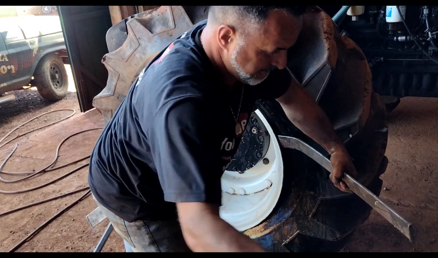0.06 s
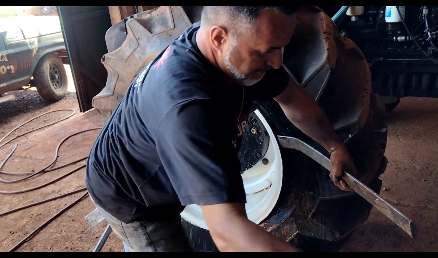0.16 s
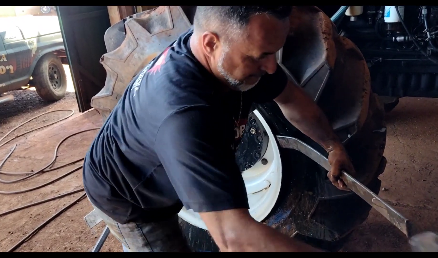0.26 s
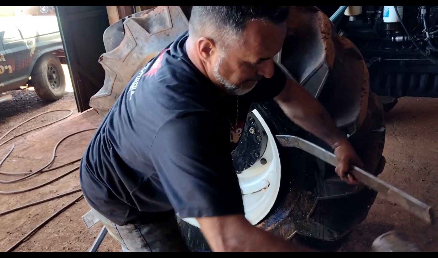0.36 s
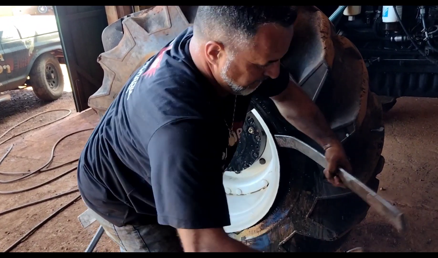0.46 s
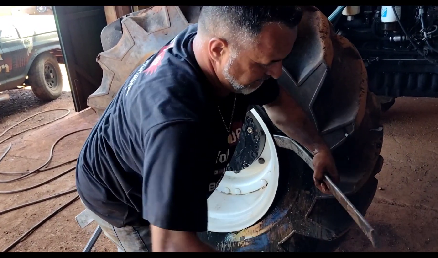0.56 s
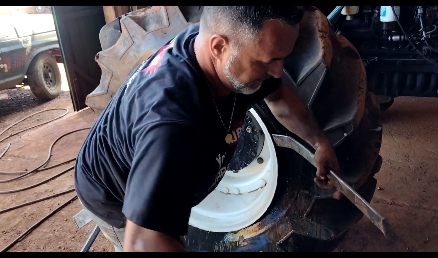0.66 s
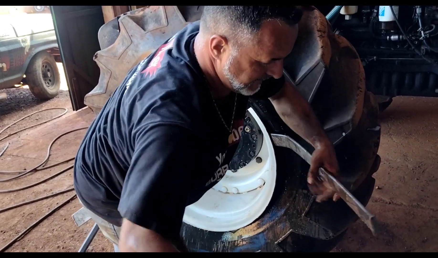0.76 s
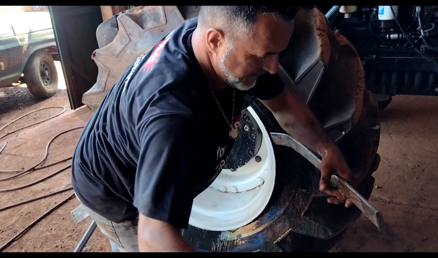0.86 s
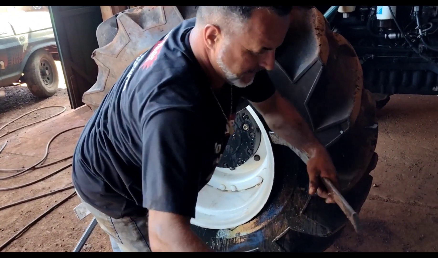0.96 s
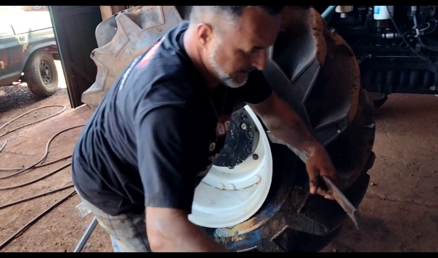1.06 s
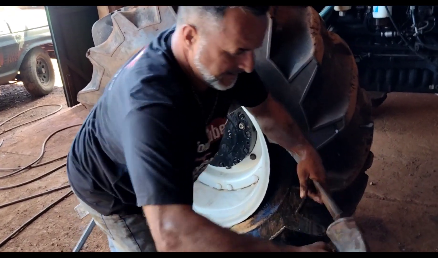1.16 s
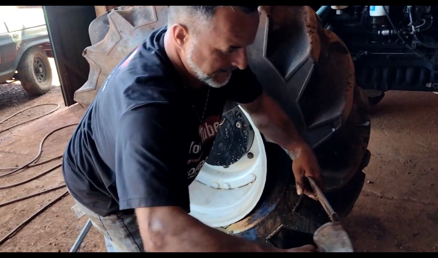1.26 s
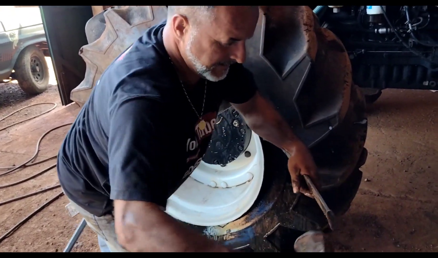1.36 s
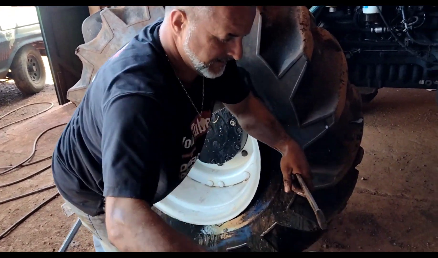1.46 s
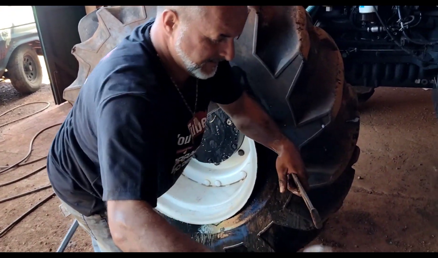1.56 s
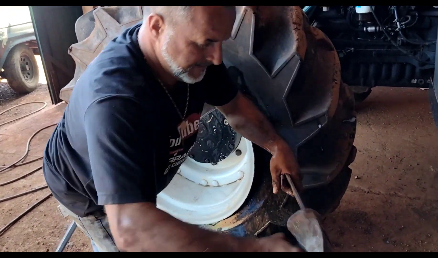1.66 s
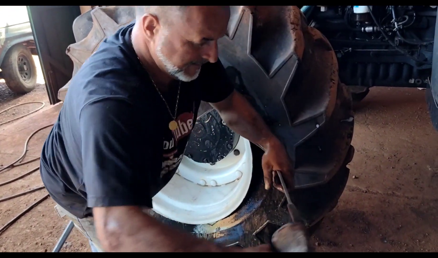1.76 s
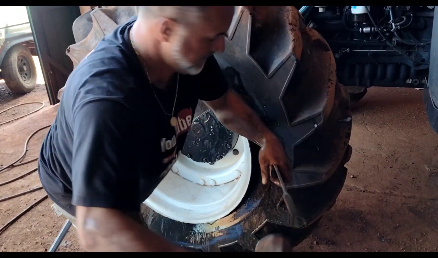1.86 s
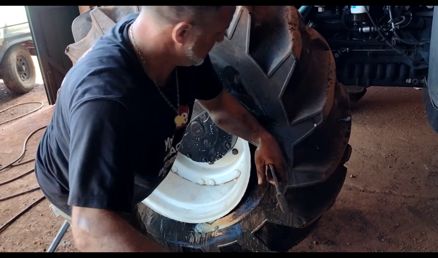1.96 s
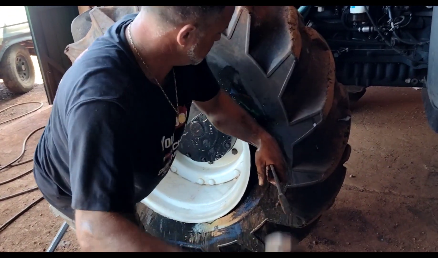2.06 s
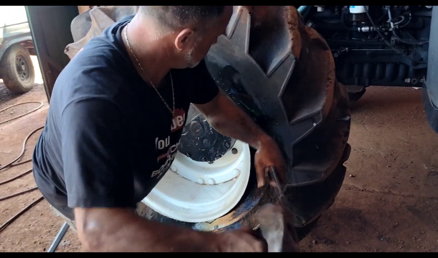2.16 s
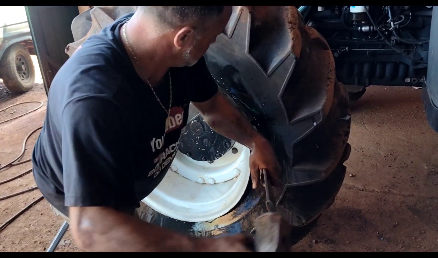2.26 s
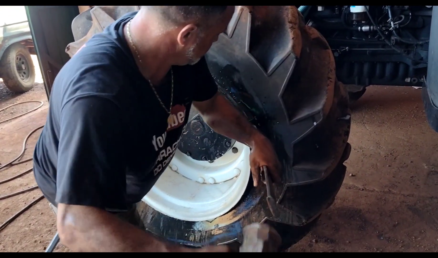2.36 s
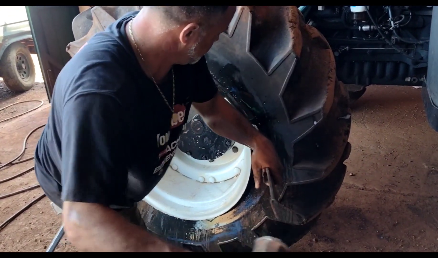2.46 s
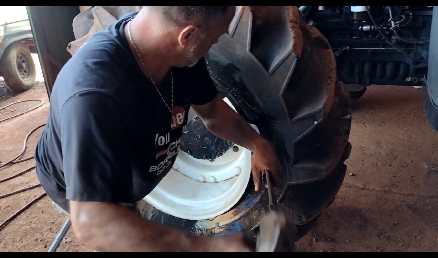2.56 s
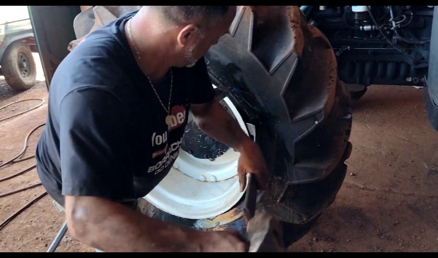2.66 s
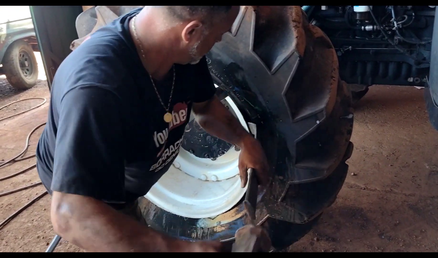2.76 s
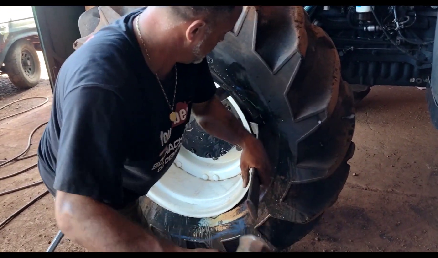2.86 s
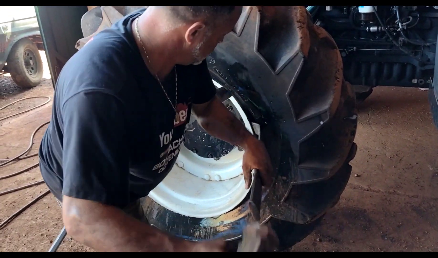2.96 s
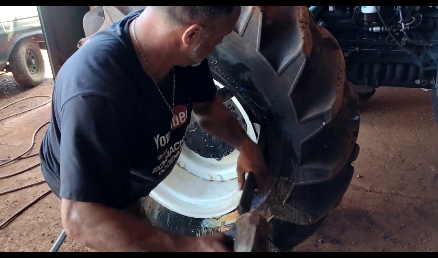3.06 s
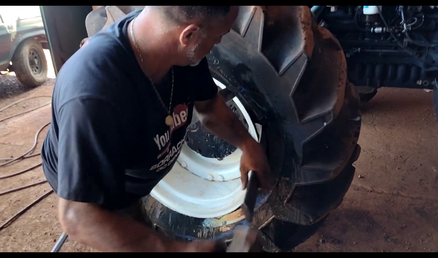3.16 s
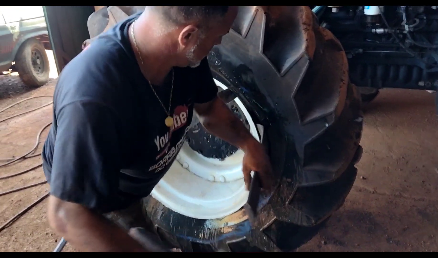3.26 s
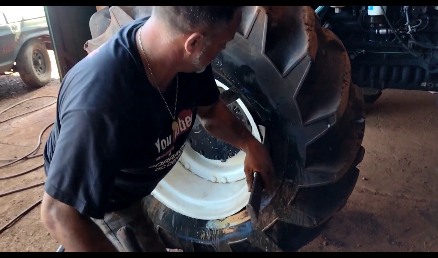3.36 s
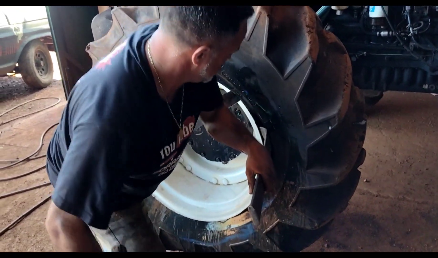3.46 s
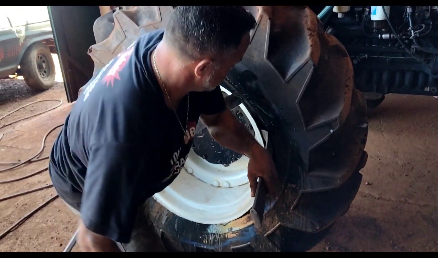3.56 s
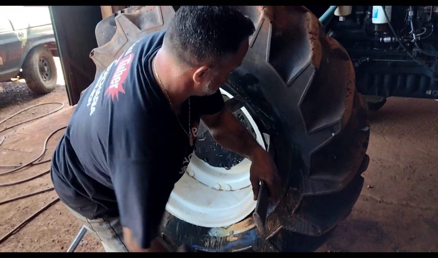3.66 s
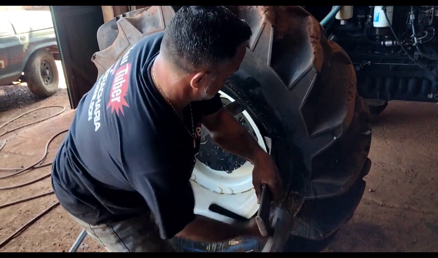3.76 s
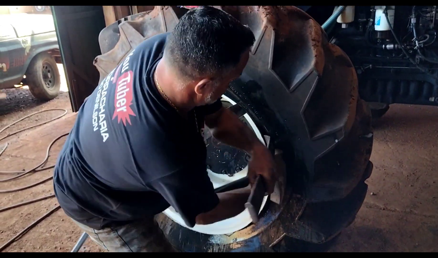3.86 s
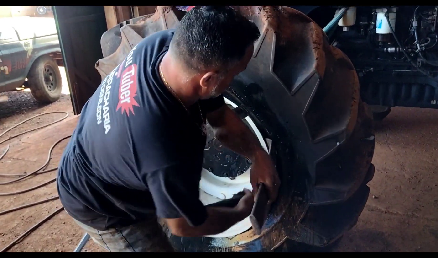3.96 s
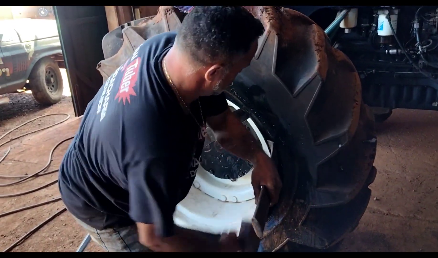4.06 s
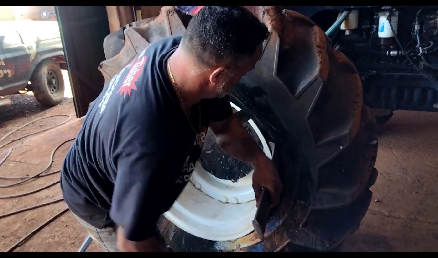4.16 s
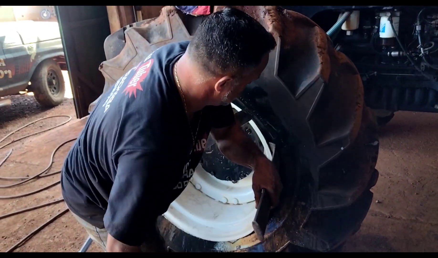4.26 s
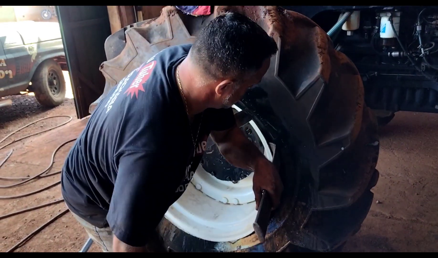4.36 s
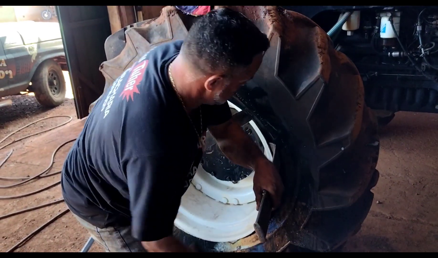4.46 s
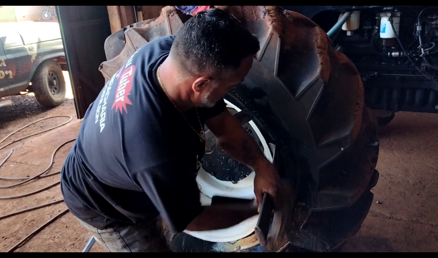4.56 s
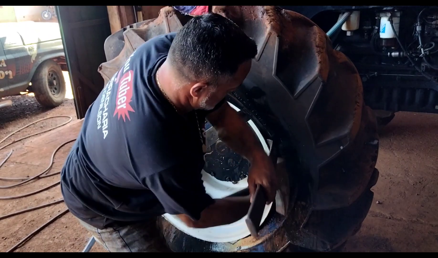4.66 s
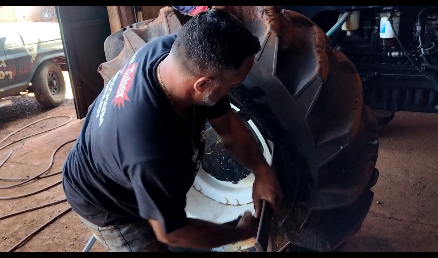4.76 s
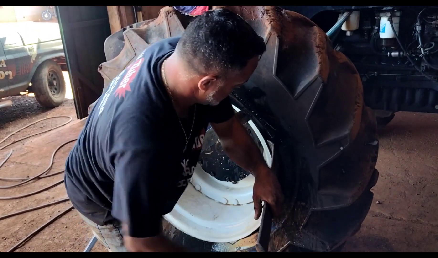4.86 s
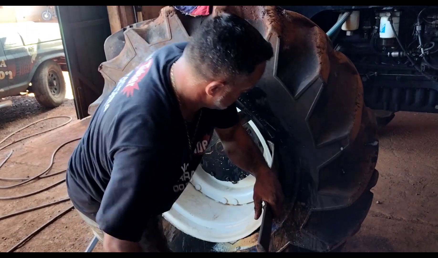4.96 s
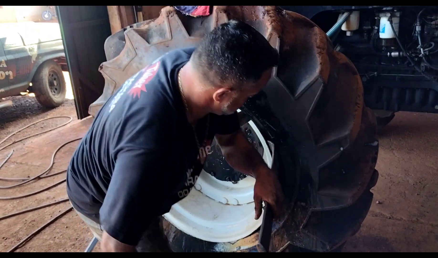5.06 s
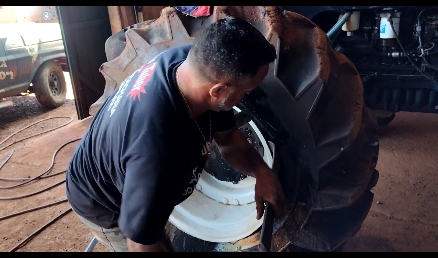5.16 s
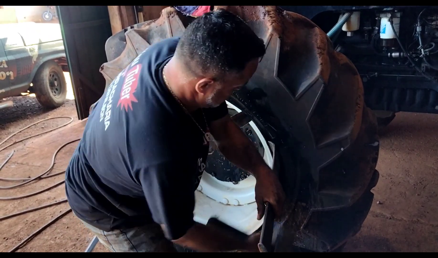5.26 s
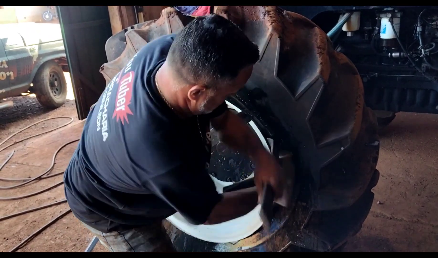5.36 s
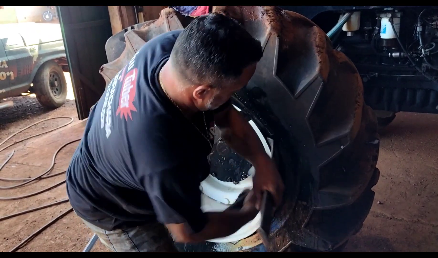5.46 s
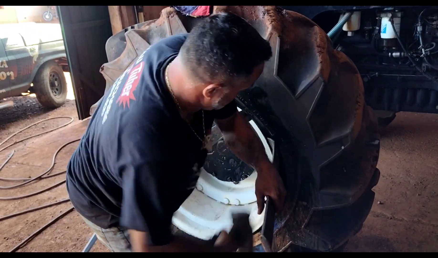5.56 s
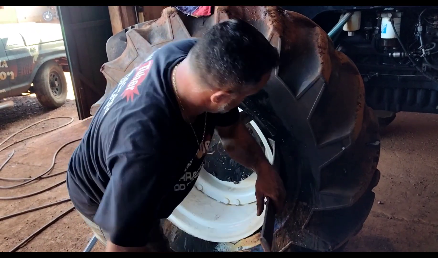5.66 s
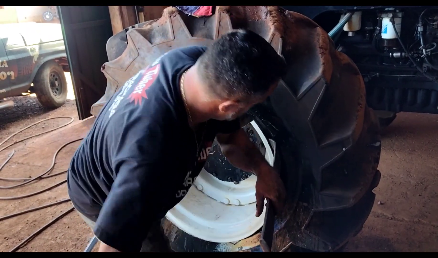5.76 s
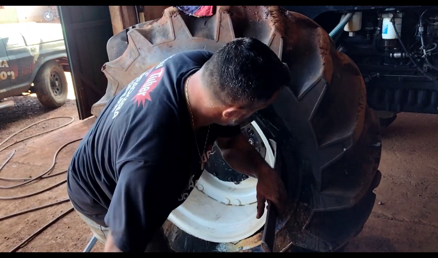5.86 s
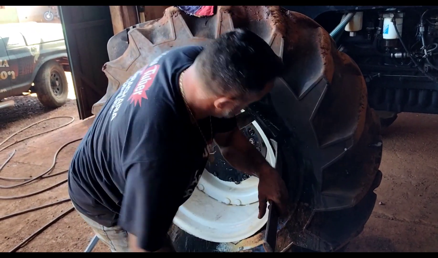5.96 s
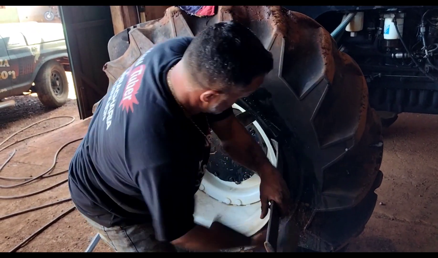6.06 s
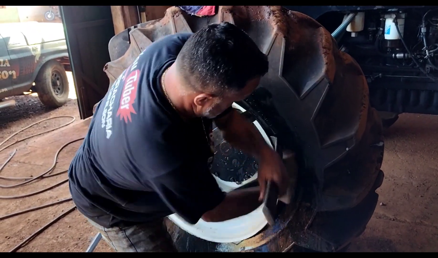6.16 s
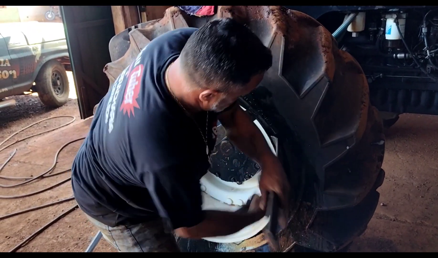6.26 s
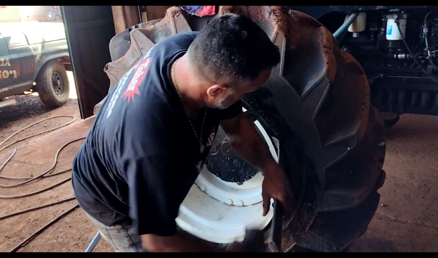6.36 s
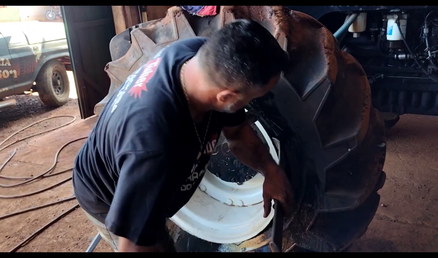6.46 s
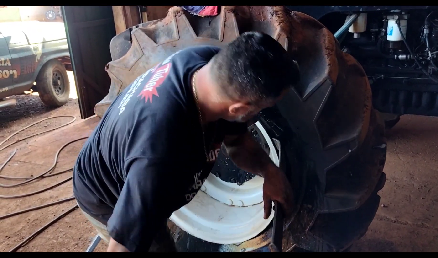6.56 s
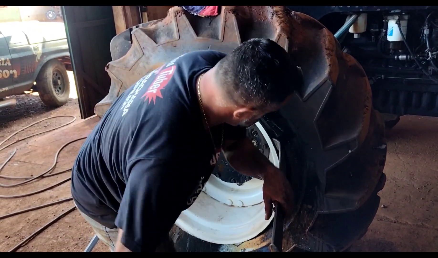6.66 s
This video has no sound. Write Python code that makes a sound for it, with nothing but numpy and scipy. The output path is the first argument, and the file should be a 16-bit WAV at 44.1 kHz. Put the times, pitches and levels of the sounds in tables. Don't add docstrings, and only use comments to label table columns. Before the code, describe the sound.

In a large echoing workshop, a hammer strikes a steel lever wedged at a big tractor wheel ten times. The first six blows are slack and clanky, getting quicker and weaker; after a pause come four slower, stronger, tighter hits. Each cracks sharply and rings for about a second. A close phone microphone overloads and ducks briefly, over faint hiss and low draught.

```python
import sys
import numpy as np
from scipy import signal
from scipy.io import wavfile
from scipy.ndimage import uniform_filter1d

SR = 44100
rng = np.random.default_rng(int(sys.argv[2]) if len(sys.argv) > 2 else 0)


def store_pcm(level_fs):
    pcm = np.round(np.clip(level_fs, -1, 1) * 32767).astype(np.int16)
    wavfile.write(sys.argv[1], SR, np.atleast_2d(pcm).T)


def ratio_of_db(decibels):
    return 10 ** (np.asarray(decibels, float) / 20)


N = 296381

STRIKES_S = [
    .3845,
    1.2351,
    1.7441,
    2.2272,
    2.6785,
    3.0839,
    3.9075,
    4.6691,
    5.4073,
    6.1987,
]
# strength in dB, bite of the lever (0 loose, 1 slack, 2 seated, 3 prying, 4 wedged),
# pitch shift in %, brightness in dB per octave, limiter depth in dB.
BLOWS = [
    (-7.5, 1.47, -0.57, 0.3, 9),
    (-9.5, 1, 0.12, -0.5, 5.5),
    (-8, 1.14, -0.34, 0.3, 5.5),
    (-10, 0.61, -0.00015, 0.2, 5),
    (-9.5, 0.071, 0.74, 0, 7.5),
    (-13.5, 0.089, .2, -0.3, 3),
    (-5.5, 2.35, 0.25, -1.33, 10.5),
    (-3, 3.2, 0.28, -1, 9.5),
    (-1.5, 3.98, -0.49, 0.75, 8),
    (-2, 3.87, .5, -.3, 8),
]
# centre in Hz, width in Hz, level in dB when loose, slack,
# seated, prying, wedged.
LEVER_MODES = [(778, 33, 0.5, 2, -4, -5, -12), (1036, 56, 4.5, 1, -5, -4, 0.5),
               (1235, 41, 0.5, 1.5, -44, -19, -19), (1462, 36, -9, -12, -31, -1.5, 5),
               (1628, 50, 1, 3, 3.5, -4, 2.5), (1846, 45, -3, 1.5, 0.7, -15, -31),
               (2273, 118, -6, 5.5, -4, -17, 10.5), (2518, 71, -2.5, 2.5, 7, -17, 3),
               (2762, 73, -12, 1.5, -13, -23, 4.5), (3416, 124, -1, 8, 5.2, -10, 1.5),
               (3770, 150, -2, -4, 0.7, -37, -30), (4010, 76, -9, -9, -4, -20, -40),
               (4290, 300, -9.5, -3, -0.5, -11, -52), (5010, 240, -4, -3, -8, -2.5, -5)]
# centre in Hz, width in Hz, level in dB when # loose, slack, seated,
# prying, wedged.
HEAD_MODES = [(5070, 65, -13, -13, -22, -17, 7.5), (5500, 86, -6, -2, -16, -9, 9.5),
              (5820, 55, -8, 3.5, -9, -7, -21), (6190, 60, -12, -7, -8, -20, -19),
              (6403, 170, -3, -2, 4.5, -6, -5), (6600, 110, -14, -22, -18, 10, -5),
              (6940, 50, -23, 4, -36, -3, 0), (7300, 104, -41, -21, 11.5, 5, -23),
              (7730, 120, 0, 4.5, -16, -12, -1), (7810, 59, -2, -11, -18, -10, 7),
              (8260, 200, -13, -28, 0, -10, -7), (9020, 45, -2, 4.5, -13, -3, 4),
              (9245, 133, -5, -5, -8, -17, -2), (9740, 64, -21, -56, -8, 0, -2)]
# centre in Hz, width in Hz, level in dB.
RIM_MODES = [(638, 57, -5.5), (774, 30, -8.5), (968, 50, -7.5), (1108, 13, -4.5), (1175, 71, -6.5),
             (1400, 66, -7.5), (1550, 30, -24), (1935, 14, -20), (2223, 164, -4.5), (2584, 44, -0.5)]
# centre in Hz, width in Hz, level in dB.
TYRE_MODES = [(161, 42, 3.5), (201.5, 24, 3), (251, 83, -0.5), (387, 51, 3.5)]
# frequency in Hz, level in dB per Hz.
KNOCK = [(60, -47), (130, -46), (300, -48), (500, -49.5), (700, -10), (1300, -11), (2400, -3.5),
         (4500, -13.5), (7000, -7), (9000, -11.5), (12000, -16), (15000, -77), (16000, -75)]
# frequency in Hz, level in dB per Hz.
CRACK = [(60, -8.5), (300, -20.5), (1000, -18), (2300, -6), (3400, -3), (4500, -9), (6500, -11.5),
         (9500, -14.5), (12000, -15.5), (16000, -21)]
# frequency in Hz, T60 in seconds.
HALL_T60 = [(100, 1.23), (260, 1.2), (700, 1.144), (1840, 1.328), (4850, 1.187), (10000, 0.8)]
# frequency in Hz, left-right likeness from 0 to 1.
HALL_LIKENESS = [(60, .7), (200, .98), (450, .85), (800, .55), (1700, .25), (2600, .05)]
# frequency in Hz, left minus right in dB.
HALL_LEAN = [(100, 3.5), (800, 4), (1650, .5), (2200, -8), (3700, 2), (4800, .5), (7000, -8), (11500, 7)]
# time in seconds, level in dB.
DRAUGHT = [
    (0.0, -51.5),
    (0.58, -52),
    (1.05, -82),
    (2.32, -80),
    (3.74, -51),
    (4.1, -47),
    (5.3, -46),
    (5.62, -42),
    (6.72, -45),
]
# frequency in Hz, level in dB per Hz.
HISS = [(25, 1.5), (170, -15.5), (560, -20), (1020, -15.5), (1400, -25), (2550, -18), (3700, -20.5),
        (4600, -26.5), (5400, -13), (6300, -12), (10400, -4), (11500, -9), (13500, -12.5), (14600, -14),
        (15400, -17.5)]
# frequency in Hz, left-right likeness from 0 to 1.
HISS_LIKENESS = [(60, 0.19), (180, 0.8), (550, 0.75), (1650, 0.15), (4970, 0.06), (15000, 0.03)]
# frequency in Hz, left minus right in dB.
HISS_LEAN = [(300, 0), (1200, -2), (2250, -11), (3000, -9), (3700, -2), (6200, -14), (8700, -4), (14000, 3)]
# frequency in Hz, threshold in dB under the whole sound.
MASKED = [(2800, 50), (3400, 27), (4700, 42), (5200, 48), (8700, 35), (10500, 34.5), (12000, 37.5),
          (15000, 45.5)]

LANDING_DB, LANDING_PERCENT = 1.6, 0.6
REGRIP_S = 3.5
THUMP_BEFORE_DB, THUMP_AFTER_DB, CRACK_THUMP_DB = -10, -19.5, -17
QUICK_S, RESTED_S = 0.49, 1
CRACK_QUICK_DB, CRACK_RESTED_DB = 18.5, -1
CRACK_TILT_DB, CRACK_TILT_DB_PER_S = -2.05, 1.1
PAN_DB, PAN_DB_PER_S = -0.2, 0.15
LEFT_LATE_SAMPLES = 10
OVERLOAD, CEILING_DB = 1.71, -16
SWING_LEFT, SWING_LEFT_PER_DB, SWING_RIGHT = -0.1, 0.067, 0.3
BLOCK_S, FIRST_BLOCK_S = 0.022041, 0.0043
LEAST_HOLD_S, LET_GO_S = 0.0775, 0.002
DRAUGHT_LEAN_DB, HISS_DB, EDGE_HZ = 1.5, -41, 15350


def evened(x):
    return x / np.sqrt(np.mean(x ** 2))


def read(points, hz):
    f, value = np.transpose(points)
    return np.interp(np.log(hz + 1), np.log(f + 1), value)


def noise_pair(length, size, likeness, gain):
    frames = 4 * length // size + 5
    hz = np.fft.rfftfreq(size, 1 / SR)[:, None]
    a, b, c, d = rng.standard_normal((frames, len(hz), 4)).T
    like = np.clip(read(likeness, hz), -1, 1)
    left = a + 1j * b
    right = like * left + np.sqrt(1 - like ** 2) * (c + 1j * d)
    z = np.array([left, right]) * gain(hz, np.arange(frames) * size / 4 / SR)
    return signal.istft(z, nperseg=size, noverlap=3 * size // 4)[1][:, :length]


def ring_modes(bite, shift_percent, landing):
    rows = np.array(LEVER_MODES + HEAD_MODES)
    share = np.maximum(1 - abs(np.clip(bite, 0, 4) - np.arange(5)), 0)
    db = rows[:, 2:] @ share + LANDING_DB * landing
    detune_percent = shift_percent + LANDING_PERCENT * landing[::-1]
    return np.column_stack([rows[:, 0] * (1 + detune_percent / 100), rows[:, 1], db])


def mode_power(rows, hz):
    centre_hz, width_hz, db = np.transpose(rows)[:, :, None]
    return (ratio_of_db(2 * db) / (1 + (2 * (hz - centre_hz) / width_hz) ** 2) ** 1.184).sum(0)


def strike(contact, rings, thump_db, tilt_db, ring_db, size=16384):
    hz = abs(np.fft.fftfreq(size, 1 / SR))
    steel = mode_power(rings, hz) + mode_power(RIM_MODES, hz)
    power = ratio_of_db(2 * read(contact, hz)) + ratio_of_db(2 * ring_db) * steel
    power = power * ratio_of_db(2 * tilt_db * np.log2((hz + 500) / 2500))
    power = power + ratio_of_db(2 * thump_db) * mode_power(TYRE_MODES, hz)
    partials = evened(uniform_filter1d(rng.standard_normal(size // 2 + 1), size=12))
    mirrored = np.minimum(np.arange(size), size - np.arange(size))
    log_gain = np.log(np.sqrt(power) * ratio_of_db(1.69 * partials[mirrored]))
    return np.fft.ifft(np.exp(np.conj(signal.hilbert(log_gain)))).real[:size // 2]


def blow(rings, strength_db, thump_db, tilt_db, direct_db, crack_tilt_db, pan_db):
    knock = strike(KNOCK, rings, thump_db, tilt_db, 0)
    tail = signal.fftconvolve(knock[None], hall(), axes=1)
    tail /= np.sqrt(np.mean(tail[:, SR // 10:SR // 5] ** 2))
    t = np.arange(1500) / SR
    clatter = rng.standard_normal((2, 1500)) * (np.exp(-t / 0.00019) + 0.23 * np.exp(-t / 0.0096))
    clatter[:, :6] += 1.3 * np.hanning(6)
    crack = strike(CRACK, rings, CRACK_THUMP_DB, crack_tilt_db, -4.0)
    direct = signal.fftconvolve(crack[None], clatter, axes=1)
    direct /= np.sqrt(np.mean(direct[:, :900] ** 2, 1, keepdims=True))
    tail[:, :direct.shape[1]] += ratio_of_db(direct_db) * direct
    return ratio_of_db(strength_db + pan_db * np.array([[.5], [-.5]])) * tail


def hall():
    clumps = rng.standard_normal((4 * 2 * SR // 256 + 5, 129)).T
    clumps = uniform_filter1d(clumps, size=24, axis=0)
    clumps = evened(uniform_filter1d(clumps, size=5, axis=1))

    def gain(hz, t):
        lean_db = read(HALL_LEAN, hz) * np.array([.5, -.5])[:, None, None]
        return ratio_of_db(lean_db) * ratio_of_db(0.6 * clumps - 60 * t / read(HALL_T60, hz))

    tail = noise_pair(2 * SR, 256, HALL_LIKENESS, gain)
    tail[0] = np.roll(tail[0], LEFT_LATE_SAMPLES)
    return tail * (1 - np.exp(-np.arange(2 * SR) / SR / 0.00053))


def scene():
    mix, last_s = np.zeros((2, N + 3 * SR)), -1
    landings = rng.standard_normal((len(BLOWS), len(LEVER_MODES + HEAD_MODES)))
    for s, (strength_db, bite, shift_percent, tilt_db, _), landing in zip(STRIKES_S, BLOWS, landings):
        rings = ring_modes(bite, shift_percent, landing)
        thump_db = THUMP_BEFORE_DB if s < REGRIP_S else THUMP_AFTER_DB
        crack_db = np.interp(s - last_s, [QUICK_S, RESTED_S], [CRACK_QUICK_DB, CRACK_RESTED_DB])
        crack_tilt_db = CRACK_TILT_DB + CRACK_TILT_DB_PER_S * s
        pan_db = PAN_DB + PAN_DB_PER_S * s
        sound = blow(rings, strength_db, thump_db, tilt_db, crack_db, crack_tilt_db, pan_db)
        at, last_s = round(s * SR), s
        mix[:, at:at + sound.shape[1]] += sound
    return mix[:, :N]


def overload(dry):
    clipped = OVERLOAD * (np.tanh(dry / OVERLOAD + .15) - np.tanh(.15))
    return signal.lfilter(*signal.butter(2, 12000, fs=SR), clipped)


def gain_control(x):
    keep = np.exp(-1 / (0.015 * SR))
    power = signal.lfilter([1 - keep], [1, -keep], (x ** 2).mean(0))
    late = np.interp(np.arange(N) - 0.00081 * SR, np.arange(N), power)
    return x / (1 + (late / ratio_of_db(2 * CEILING_DB)) ** 1.727) ** (0.44 / 1.79)


def bias_swing():
    t, swing = np.arange(N) / SR, np.zeros((2, N))
    for s, (*_, depth_db) in zip(STRIKES_S, BLOWS):
        left = SWING_LEFT + SWING_LEFT_PER_DB * depth_db
        u = np.maximum(t - s, 0)
        for k, (size, turn_hz) in enumerate([(left, 1.7), (SWING_RIGHT, 1.25)]):
            slow = np.cos(2 * np.pi * turn_hz * (u - .07)) * np.exp(-u / 0.22)
            dip = 2.2 * np.exp(-u / 0.036)
            swing[k] += 0.66 * size * (slow - dip) * (1 - np.exp(-u / 0.028))
    return swing


def limiter_db():
    t, gain_db = np.arange(N) / SR, np.zeros(N)
    for s, (*_, depth_db) in zip(STRIKES_S, BLOWS):
        blocks = np.ceil((s + LEAST_HOLD_S - FIRST_BLOCK_S) / BLOCK_S)
        release_s = FIRST_BLOCK_S + BLOCK_S * blocks
        steps_s = [s - .0105, s - .008, s + .0014, s + .0021, release_s - LET_GO_S, release_s + LET_GO_S]
        gain_db += np.interp(t, steps_s, [0, -11.5, -9.5, -2.5 - depth_db, -depth_db, 0])
    return gain_db


def draught():
    def gain(hz, t):
        return ratio_of_db(np.interp(t, *np.transpose(DRAUGHT))) / (1 + (hz / 38) ** 4)

    air = evened(noise_pair(N, 4096, [(20, 0.35), (100, .3)], gain))
    rms = np.sqrt(np.mean(ratio_of_db(2 * np.transpose(DRAUGHT)[1])))
    return ratio_of_db(DRAUGHT_LEAN_DB * np.array([[.5], [-.5]])) * air * rms


def hiss():
    patches = evened(uniform_filter1d(rng.standard_normal(N // 256 + 20), 20))

    def gain(hz, t):
        lean_db = np.array([.5, -.5])[:, None, None] * read(HISS_LEAN, hz)
        return ratio_of_db(read(HISS, hz) + lean_db + 0.67 * patches[:len(t)])

    return ratio_of_db(HISS_DB + 3.5) * evened(noise_pair(N, 1024, HISS_LIKENESS, gain))


def drop_masked(x, size=8):
    hz, _, z = signal.stft(x, SR, "cosine", nperseg=2048, noverlap=1024)
    bands = (abs(z[:, :-1]) ** 2).sum(0).reshape(-1, size, z.shape[2]).sum(1)
    floor = bands[1:].sum(0) * ratio_of_db(-2 * read(MASKED, hz[size // 2::size]))[:, None]
    floor = floor * ratio_of_db(4.2 * rng.standard_normal(floor.shape))
    z[:, :-1] *= np.repeat(bands > floor, size, axis=0)
    return signal.istft(z, SR, "cosine", nperseg=2048, noverlap=1024)[1][:, :N]


def top_cut(x):
    return signal.sosfilt(signal.butter(12, 16520, fs=SR, output="sos"), x)


def record(dry):
    levelled = gain_control(overload(dry))
    duck_db = limiter_db()
    held = (levelled + bias_swing() + draught()) * ratio_of_db(duck_db) + hiss() * ratio_of_db(0.99 * duck_db)
    low_pass = signal.firwin(255, EDGE_HZ, window=("kaiser", 9), fs=SR)
    limited = signal.oaconvolve(held, low_pass[None], "same")
    return top_cut(drop_masked(limited))


dry = scene()
out = record(dry)
store_pcm(out)
```